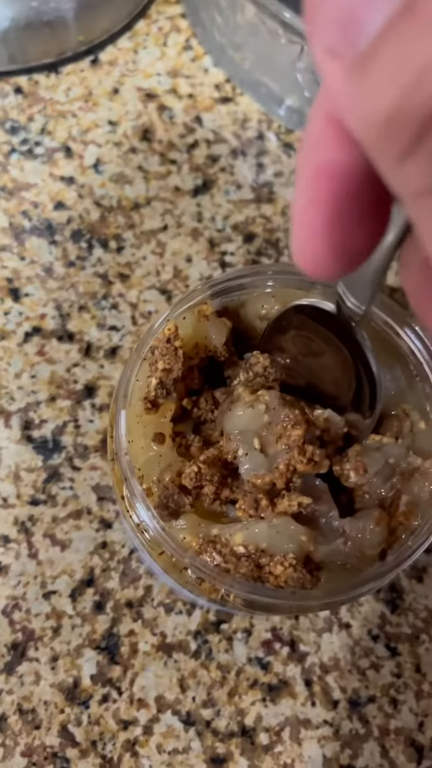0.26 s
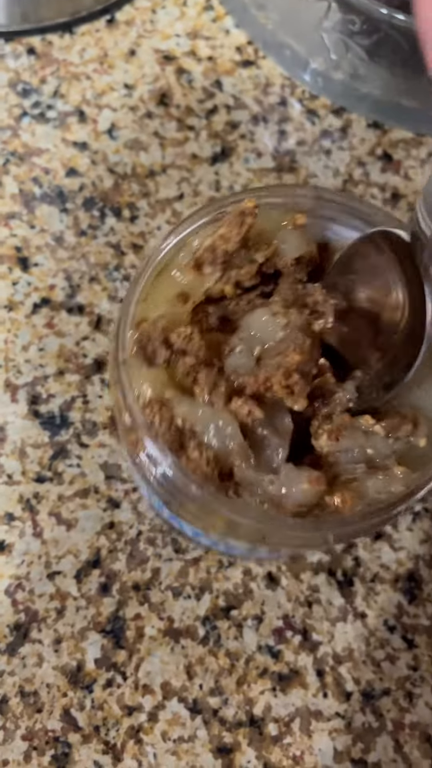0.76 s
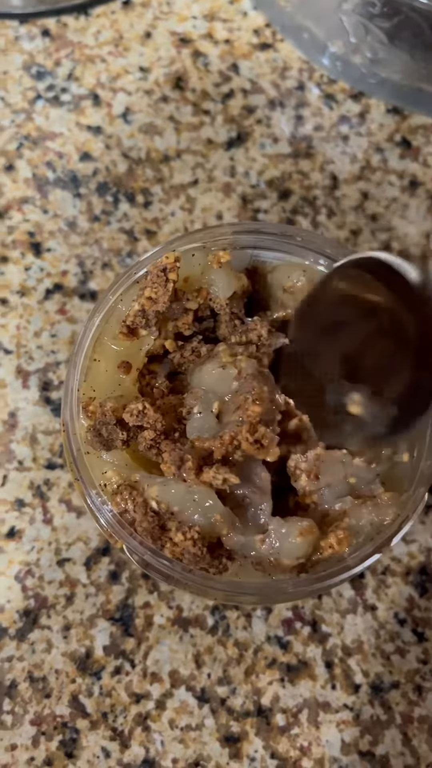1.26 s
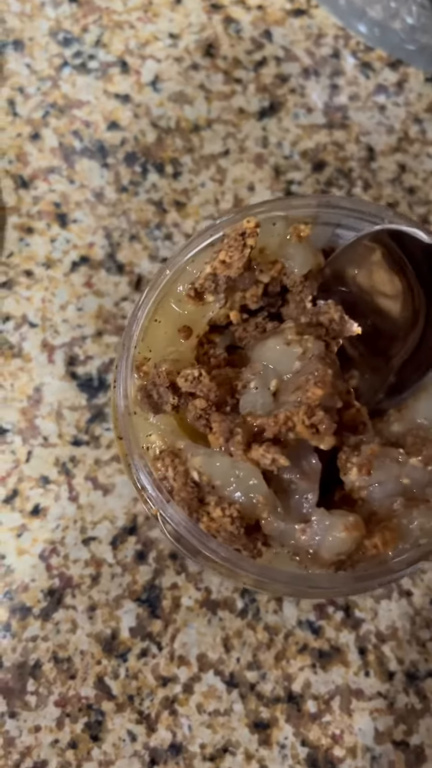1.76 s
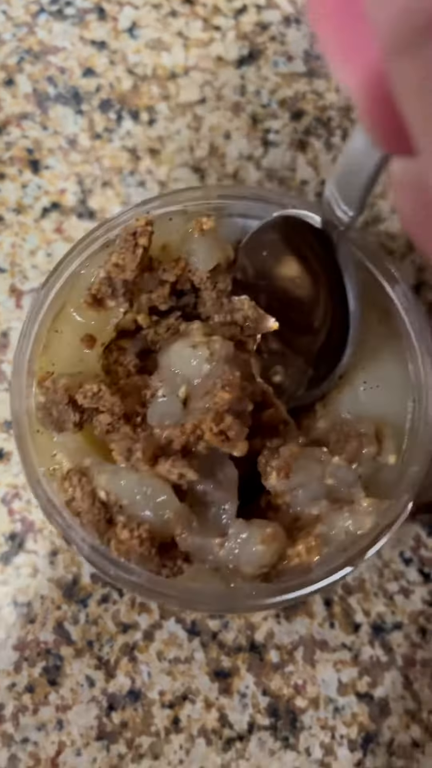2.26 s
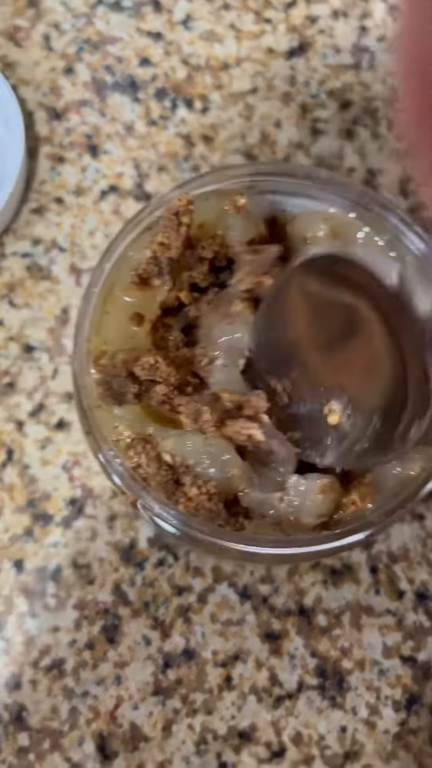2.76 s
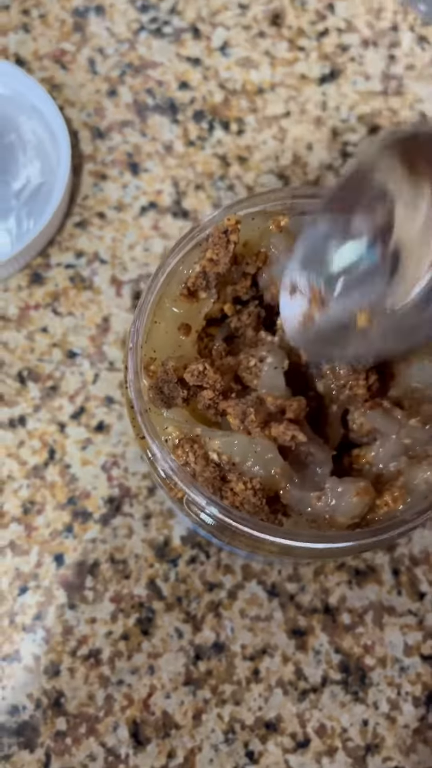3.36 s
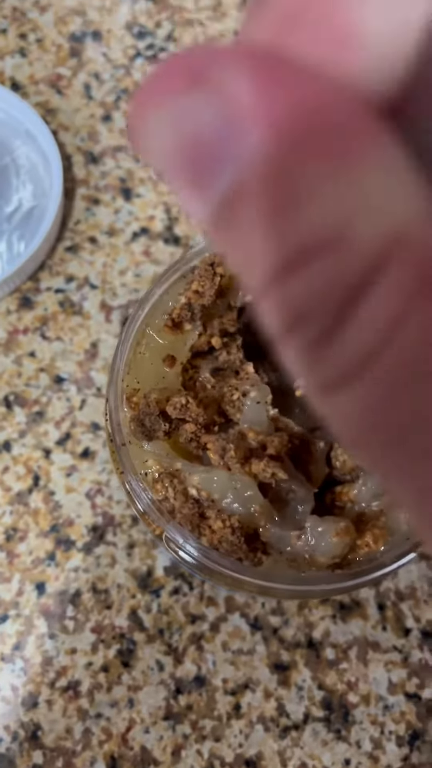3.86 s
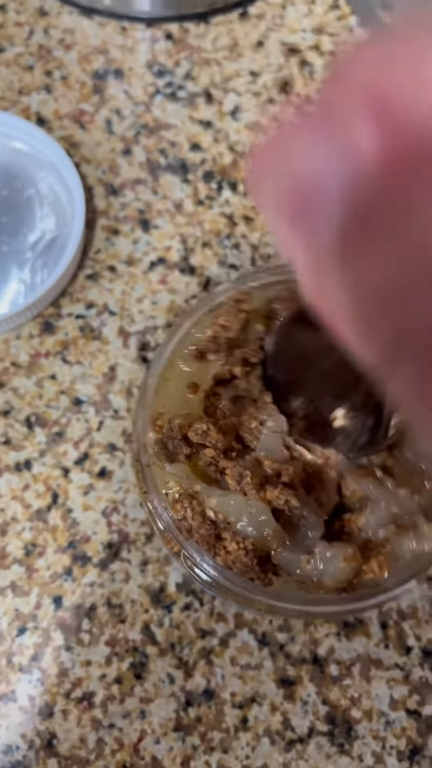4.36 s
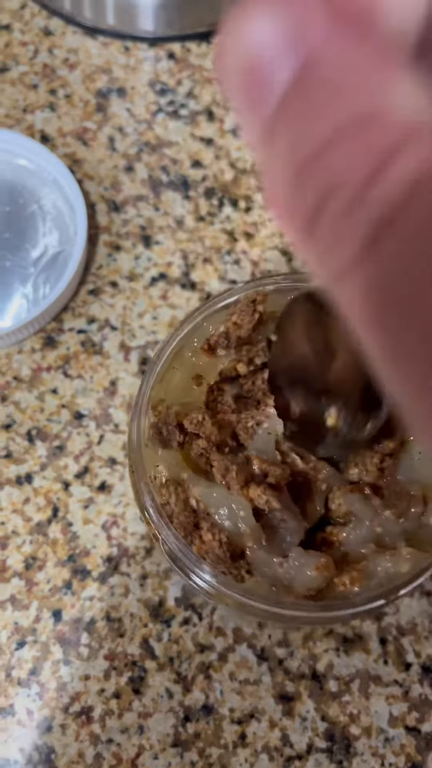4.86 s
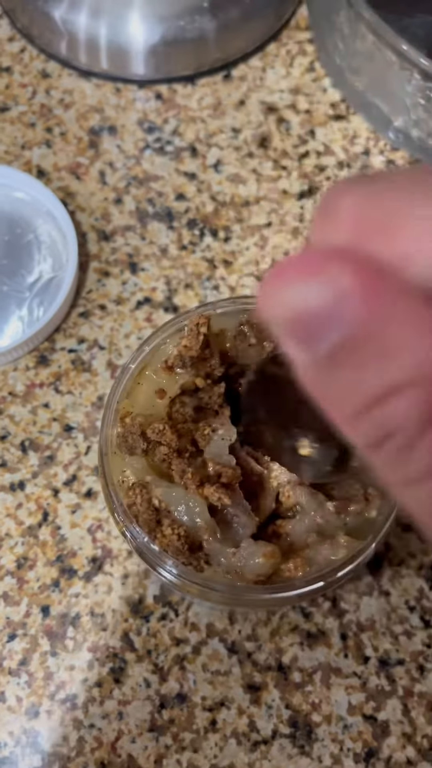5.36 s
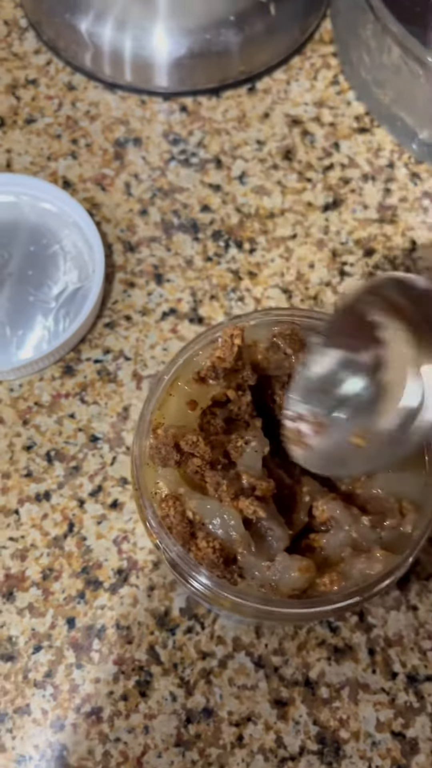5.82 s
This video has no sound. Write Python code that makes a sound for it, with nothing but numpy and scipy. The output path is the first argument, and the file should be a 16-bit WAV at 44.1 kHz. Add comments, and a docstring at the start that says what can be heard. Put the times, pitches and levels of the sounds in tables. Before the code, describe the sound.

Close up in a quiet kitchen, a spoon works sticky nut butter in a jar: dull knocks, short gritty rasps, ticks and tiny pops.

```python
"""A few faint ticks and pops over quiet room tone come first; then low thuds, raps and gritty scrapes set in.
A metal spoon is pushed again and again into thick peanut butter in a glass jar on a stone kitchen counter.
Knocks of the jar excite decaying modes of the slab; scrapes are coloured grit noise shaped stroke by stroke.
Taps and popping air pockets excite damped resonances, and bare glass clinks, squeaks and sings.
Kitchen reflections surround the jar, over a low rumble, a faint drone and a few dull, distant bumps."""
import sys
import numpy as np
from scipy import signal
from scipy.fft import rfft, irfft, next_fast_len
from scipy.io import wavfile

SR = 44100
rng = np.random.default_rng(int(sys.argv[2]) if len(sys.argv) > 2 else 0)


def waveform_to_disk(signal):
    """Save audio, clipped to [-1, 1], as 16-bit WAV at the path in sys.argv[1]."""
    frames = np.transpose(np.atleast_2d(signal))
    scaled = np.clip(frames, -1, 1) * 32767
    samples = np.round(scaled).astype(np.int16)
    wavfile.write(sys.argv[1], SR, samples)


N = 268569
TIME = np.arange(N) / SR
PADDED = next_fast_len(N + SR)
HZ = np.maximum(np.arange(PADDED // 2 + 1) * SR / PADDED, 1)

# jar knocked on the counter: t/s, relative level/dB, hardness of the contact as a corner f/Hz
KNOCKS = [(0.078, -59, 3000), (0.609, -45.5, 3000), (0.611, -23.5, 74), (0.681, -36, 127),
          (0.804, -34.5, 149), (1.204, -26, 54), (1.292, -36.5, 80), (1.581, -46, 109), (1.736, -34.5, 70),
          (2.114, -29.5, 65), (2.179, -12, 4000), (2.273, -30, 281), (2.725, -21.5, 69), (3.531, -19, 58.4),
          (4.301, -27, 225), (4.342, -33, 80), (4.529, -42, 139), (4.76, -29, 115), (4.881, -36.5, 350),
          (5.22, -49.5, 300), (5.232, -23, 66.3), (5.957, -31, 71)]
# resonances of spoon and jar, damped by the paste: f/Hz, width/Hz, relative level/dB
DAMPED_MODES = [(1700, 970, -7.5), (2880, 140, -7.5), (3290, 210, -5.5), (5130, 860, 3), (7170, 2070, 3),
                (9000, 3200, 6), (11700, 5500, 3), (13900, 1100, -3.5), (14910, 4200, -10.5)]


def from_db(db):
    """Decibels to amplitude gain: 20 dB is a factor of ten."""
    return 10 ** (np.asarray(db) / 20)


def rms_one(x):
    """Normalise the mean power, so that rms is 1."""
    return x / np.sqrt(np.mean(x ** 2) + 1e-20)


def at_hz(points, hz):
    """Interpolate a table on a logarithmic frequency axis, where equal steps are equal intervals."""
    f, value = np.transpose(points)
    return np.interp(np.log(hz), np.log(np.maximum(f, 1)), value)


def in_time(rows):
    """Interpolate each column of a time curve linearly at every sample."""
    s, *columns = np.transpose(rows)
    return [np.interp(TIME, s, column) for column in columns]


def filtered(x, response):
    """Linear filtering: the spectrum is multiplied by a frequency response."""
    return irfft(rfft(x, PADDED) * response, PADDED)[..., :N]


def coloured(x, spectrum):
    """Spectral shaping by a table of f/Hz and level/dB, normalised to rms 1."""
    return rms_one(filtered(x, from_db(at_hz(spectrum, HZ))))


def resonance(x, hz, width):
    """A damped oscillator as a two-pole filter: the pole radius sets the width, the peak gain is 1."""
    r = np.exp(-np.pi * width / SR)
    zeros = np.array([1, 0, -1]) * (1 - r * r) / 2
    poles = [1, -2 * r * np.cos(2 * np.pi * hz / SR), r * r]
    return signal.lfilter(zeros, poles, x + 1e-18)


def drift(rate):
    """Random modulation: low-passed noise with rms 1."""
    return rms_one(filtered(rng.standard_normal(N), 1 / (1 + (HZ / rate) ** 2)))


def thuds(vary_db=4, slop_s=.004, soft_hz=150, steady_hz=190, cushion_hz=250):
    """Dispersion: low bending waves travel slower in the slab, so the clack comes first and the boom last."""
    # what slab and jar ring with after a knock: f/Hz, relative level/dB, t60/s
    counter_modes = [(62, -.5, .038), (78, .2, .095), (84, -24, .5), (118, 1.5, .05), (156, -20, .2),
                     (194, -4.9, .057), (258, -3.5, .034), (300, -24.5, .34), (340, -27.5, .36),
                     (382, 1, .02), (488, -31, .12), (569, -12, .026), (786, -26, .08), (860, -22, .07),
                     (1032, -3, .013), (1241, -21.5, .04), (1669, -17, .016)]
    lag_cycles, rise_cycles = 2.1, .4
    out = np.zeros(N + SR)
    since = TIME[:SR // 2]
    for s, db, hard_hz in KNOCKS:
        # a soft push is a smear of slips, different every time
        softness = 1 / (1 + (hard_hz / soft_hz) ** 2)
        start = round(s * SR)
        draws = rng.standard_normal((len(counter_modes), 2))
        for (hz, mode_db, t60), (louder, later) in zip(counter_modes, draws):
            # the slow boom feels only the whole push
            chance = softness / (1 + (steady_hz / hz) ** 2)
            age = np.maximum(since - lag_cycles / hz - chance * slop_s * later, 0)
            onset = 1 - np.exp(-(age * hz / rise_cycles) ** 2)
            swing = onset * np.exp(-np.log(1000) * age / t60)
            strength = from_db(db + mode_db + chance * vary_db * louder) / (1 + (hz / hard_hz) ** 2)
            # the paste swallows the clack of a soft push
            strength /= 1 + (hz / (hard_hz + cushion_hz)) ** 4
            out[start:start + len(since)] += strength * swing * np.sin(2 * np.pi * hz * age)
    return out[:N]


def shudder(level_db=-29, fade_s=0.0063, soft_hz=400, boom_hz=80):
    """Friction noise: a soft push makes the jar's foot grind unevenly on the stone for a moment."""
    colour = ((25, -14), (55, 1), (110, -3), (180, 0), (330, -7), (520, -24), (1100, -28), (2500, -52))
    size = np.zeros(N)
    for s, db, hard_hz in KNOCKS:
        age = np.maximum(TIME - s, 0) / fade_s
        boom = from_db(db + level_db) / (1 + (boom_hz / hard_hz) ** 2)
        size += boom / (1 + (hard_hz / soft_hz) ** 2) * np.sqrt(age) * np.exp(1 - age)
    return size * coloured(rng.standard_normal(N), colour)


def rattle(level_db=-29.5, rise_s=0.01, fade_db_per_s=135, firm_hz=650):
    """Repeated impact: after a firm knock the jar chatters on the stone in uneven, dying contacts."""
    # of the jar's foot: f/Hz, relative level/dB
    foot_colour = [(110, -14), (160, 0.5), (330, 0.5), (450, -9), (580, -8.5), (750, -18.5), (1150, -16),
                   (1500, -26), (2500, -27.5), (5000, -40.5)]
    size = np.zeros(N)
    for s, db, hard_hz in KNOCKS:
        age = np.maximum(TIME - s, 0)
        firmness = 1 / (1 + (firm_hz / hard_hz) ** 2)
        size += from_db(db + level_db - fade_db_per_s * age) * np.minimum(age / rise_s, 1) * firmness
    return size * coloured(grit(per_s=120, spread_db=3.0, smooth=0.51), foot_colour)


def grit(per_s, spread_db, smooth):
    """Shot noise: contacts give way at random as clicks of uneven size, over a smooth smear."""
    sizes = from_db(spread_db * np.minimum(rng.exponential(1, N), 4)) * rng.choice([-1, 1], N)
    clicks = sizes * (rng.random(N) < per_s / SR)
    return rms_one(clicks) + smooth * rng.standard_normal(N)


def shifting_grit(ripple_hz=260, ripple_db=2.4, shift_rate=2.985, count=4):
    """Modal colouring: as the spoon touches the jar in other places, other mild resonances colour the grit."""
    knots = np.arange(0, SR / 2, ripple_hz)
    weights = np.exp([1.6 * drift(shift_rate) for place in range(count)])
    out = 0
    # the squared weights always sum to one, so the power is shared between the places
    for weight in weights / np.sqrt(np.sum(weights ** 2, axis=0)):
        ripple = np.interp(HZ, knots, rng.standard_normal(len(knots)))
        place_grit = grit(per_s=1900, spread_db=2.0, smooth=1.0)
        out = out + weight * rms_one(filtered(place_grit, from_db(ripple_db * ripple)))
    return out


def stroke_db(start, push, hold):
    """Viscous yielding: level swells with the push, sags as the paste yields, dies as the spoon comes to rest."""
    rise_db, sag_db_per_s, release_db_per_s = 20.5, 20.5, 273
    age = TIME - start - push
    swell = rise_db * (np.minimum(age, 0) / push) ** 2
    return -swell - sag_db_per_s * np.clip(age, 0, hold) - release_db_per_s * np.maximum(age - hold, 0)


def stroke_levels():
    """Spectral balance in dB: a bright stroke trades rub for crackle, one along the glass rasps more."""
    # strokes through the paste: start t/s, push/s, hold/s, relative level/dB, brightness/dB, rasp on the glass/dB
    strokes = [(0.07, 0.023, 0.88, -86, 2.5, -12), (0.495, 0.028, 0.14, -74.5, -2.5, -1.5),
               (0.612, 0.1, 0.039, -70, 6.5, 1), (0.744, 0.058, 0.058, -69, 3, 1.5),
               (1.188, 0.024, 0.11, -65, 4, -2), (1.312, 0.19, 0.12, -74.5, -1, -1),
               (1.532, 0.03, 0.021, -69.5, -1.5, -1.5), (1.597, 0.072, 0.04, -75.5, -5, -4),
               (1.933, 0.077, 0.064, -82.5, -3.5, -14), (2.165, 0.14, 0.0092, -69, 2.5, 5),
               (2.307, 0.044, 0.012, -68.5, 5, 6.5), (2.41, .03, 0.27, -93, 5.5, -1),
               (2.682, 0.04, 0.0043, -62, 5.5, -2), (2.766, 0.13, 0.025, -70, 2, 0.5),
               (2.896, 0.087, 0.037, -73.5, 1.5, -2.5), (3.173, 0.042, 0.014, -72.5, 9.5, 10),
               (3.23, 0.027, 0.012, -97.5, 4.5, 0), (3.527, 0.014, 0.0047, -59, 1.5, -4),
               (3.55, .02, 0.043, -72.5, -0.5, -7), (3.597, 0.11, 0.06, -68, -2, -4),
               (3.893, 0.068, 0.097, -79, 3.5, 2), (4.289, 0.0059, 0.062, -64.5, 1.5, 0),
               (4.337, 0.024, 0.1, -74, -4, -7.5), (4.672, 0.019, 0.11, -75.5, 1, -11),
               (4.75, 0.056, 0.031, -67.5, 1, -4), (4.871, 0.023, 0.057, -65, -1.5, 4),
               (5.205, 0.044, 0.14, -65.5, 1.5, 1), (5.42, 0.17, 0.11, -85, 8.5, -2.5),
               (5.591, 0.039, 0.031, -71.5, 3.5, 0), (5.906, 0.09, .12, -67.5, 5.5, -1)]
    rub = rasp = crackle = np.full(N, -np.inf)
    for start, push, hold, db, bright_db, glass_db in strokes:
        level = db + stroke_db(start, push, hold)
        rub = np.maximum(rub, level - bright_db)
        rasp = np.maximum(rasp, level + glass_db)
        crackle = np.maximum(crackle, level + bright_db)
    return rub, rasp, crackle


def scrape(lumps_db=1.0, patchy_db=1.8, crumbs_db=-15.5, clump_db=3.5):
    """Shear and fracture: crumbs and lumps drive all registers, while threads snap in clumps in each alone."""
    # low rub: f/Hz, relative level/dB
    rub_colour = [(120, -5), (250, -5.5), (400, 0), (600, -32), (1000, 0), (1400, 5), (1800, 8.5),
                  (2300, 4), (3000, 3.5), (3800, -9), (5000, -22)]
    # rasp on the glass: f/Hz, relative level/dB
    rasp_colour = [(2400, -15), (3300, 3), (4200, -3), (5100, 3.5), (5700, -4.5), (6600, -0.5), (8000, -16)]
    # fine crackle: f/Hz, relative level/dB
    crackle_colour = [(5000, -23), (7000, -5.5), (8500, -4), (9500, -3), (10500, 0), (11850, 2),
                      (13000, -3), (14500, -4), (15600, -2), (16100, -31.5)]
    colours = rub_colour, rasp_colour, crackle_colour
    register_db, sticky_db = (0.5, -2.0, -1.6), (-5, -6, -1)
    shear = shifting_grit() + from_db(crumbs_db) * grit(per_s=49, spread_db=1.0, smooth=0)
    paste = 0
    for level, colour, db, threads_db in zip(stroke_levels(), colours, register_db, sticky_db):
        snaps = grit(per_s=480, spread_db=1.0, smooth=0) * from_db(clump_db * drift(50))
        threads = from_db(threads_db) * rms_one(snaps)
        gain = from_db(level + db + patchy_db * drift(45))
        paste = paste + gain * coloured(shear + threads, colour)
    return paste * from_db(lumps_db * drift(22))


def ticks(tap_db=-1.0, lowest_hz=1100):
    """Selective excitation: a tap rings all modes, a pop mainly those near its pitch and with little tail."""
    # the spoon taps the glass: t/s, relative level/dB, tilt/(dB per octave), contact time scale/s
    tap_rows = [(0.08, -64.5, -19, 0.00047), (0.508, -75, 1, .0006), (0.525, -48.5, -5.5, 0.0044),
                (0.568, -58.5, -6.5, 0.0025), (1.209, -86, -17, 0.0027), (1.541, -43.5, -10, 0.0019),
                (2.1806, -35, -8.5, 0.0025), (2.1866, -47, 0.5, 0.0013), (2.276, -50, -7, 0.00081),
                (2.391, -56, -5, 0.002), (2.8887, -65, 2.5, 0.00065), (3.191, -73, 6, 0.0023),
                (3.202, -57.5, 6.5, 0.0026), (3.21, -64, 4.5, 0.00074), (3.538, -60.5, -14, 0.001),
                (3.544, -57, -14, 0.0028), (4.0145, -48, -1, 0.00057), (4.2942, -48.5, -7.5, 0.0011),
                (4.3, -47.5, -13, 0.028), (4.886, -44, -2.5, 0.00088), (4.913, -56, -19, .002),
                (5.27, -54, -19, 0.00081), (5.6652, -62, 0.5, 0.0017)]
    # air pockets pop in the paste: t/s, relative level/dB, pitch f/Hz
    pop_rows = [(0.086, -72, 12800), (0.1073, -57, 12100), (0.1701, -58.5, 11900), (0.188, -77, 9500),
                (0.1943, -61, 10800), (0.2162, -60.5, 10900), (0.292, -70.5, 11700), (0.463, -60, 8200),
                (0.492, -55.5, 11100), (0.514, -66, 10500), (0.5263, -48, 12100), (1.272, -52, 12600),
                (1.5176, -47.5, 10100), (1.57, -55.5, 11000), (1.7648, -65.5, 5700), (1.887, -86, 9000),
                (2.691, -65, 12160), (2.735, -56.5, 9300), (2.745, -67.5, 9000), (2.9, -71, 12500),
                (3.01, -59, 12900), (3.0463, -63.5, 13600), (3.073, -70.5, 13900), (3.271, -69, 7860),
                (3.2811, -60, 5300), (3.889, -69, 14700), (3.9995, -67.5, 12500), (4.4159, -58.5, 9200),
                (4.4198, -60.5, 8900), (4.681, -67.5, 9600), (4.798, -58, 12600), (4.811, -63, 12500),
                (4.8296, -45.5, 9500), (4.837, -67, 6050), (4.873, -58, 13100), (4.8893, -49.5, 9700),
                (5.357, -58, 13500), (5.465, -73.5, 14000), (5.519, -78, 10000), (5.535, -73, 10700),
                (5.604, -70.5, 10000), (5.618, -65, 9740), (5.626, -62.5, 10200)]
    tap_pivot_hz = 1960   # the tilt turns about this pitch
    pop_s, pop_skirt_db_per_octave = 0.0016, 16.5
    mode_hz = np.transpose(DAMPED_MODES)[0]
    taps, pops = np.zeros(N), np.zeros(N)
    for s, db, tilt, length in tap_rows:
        taps += tick(s, length, db + tilt * np.log2(mode_hz / tap_pivot_hz), tail_db=-6.5)
    for s, db, hz in pop_rows:
        octaves_away = np.abs(np.log2(mode_hz / hz))
        pops += tick(s, pop_s, db - pop_skirt_db_per_octave * octaves_away, tail_db=-32)
    too_small_for_bass = signal.butter(4, lowest_hz, "high", fs=SR, output="sos")
    return signal.sosfilt(too_small_for_bass, from_db(tap_db) * taps + pops)


def tick(s, length, colour_db, tail_db, tail_s=0.0073, size=2048):
    """Impulse response: a snap, a burst of tiny slips and a short crumble all ring the damped modes."""
    snap_s = .0012   # snap and slips are equally strong at this length; longer contacts grind
    span_s = .005   # each mode's energy is scaled to that of rms 1 over this span
    out, age = np.zeros(N + size), np.arange(size) / SR
    noise, start = rng.standard_normal(size), round(s * SR)
    snap = rms_one(1. * (age == 0))
    burst = rms_one(noise * age * np.exp(-np.e * age / length))
    crumble = rms_one(noise * np.exp(-age / tail_s))
    force = rms_one(snap + length / snap_s * burst) + from_db(tail_db) * crumble
    for k, (hz, width, db) in enumerate(DAMPED_MODES):
        mode = resonance(force, hz, width) * (-1) ** k
        mode /= np.sqrt(np.sum(mode ** 2) / (span_s * SR))
        out[start:start + size] += from_db(db + colour_db[k]) * mode
    return out[:N]


def clinks(rise_s=0.00033):
    """Free vibration: the struck bare wall rings briefly, its pitch set by how much paste clings to the spot."""
    # the bare jar wall is struck: t/s, relative level/dB, lowest pitch f/Hz
    strikes = [(0.526, -40, 1590), (1.5423, -46.5, 1840), (2.277, -44.5, 1670), (2.291, -56, 1900),
               (2.391, -47.5, 1900), (4.294, -48, 1930), (4.311, -46, 2720), (4.8856, -37, 1700)]
    # its ring: multiple of the lowest pitch, relative level/dB, t60/s
    glass_modes = [(1, 3.5, 0.0097), (1.015, -32, 0.11), (1.62, -5, 0.0033), (2.85, -21, 0.007)]
    out, age = np.zeros(N + SR), TIME[:SR // 4]
    for s, db, hz in strikes:
        ring = 0
        for multiple, level, t60 in glass_modes:
            decay = from_db(level) * np.exp(-np.log(1000) * age / t60)
            ring = ring + decay * np.sin(2 * np.pi * hz * multiple * age)
        start = round(s * SR)
        out[start:start + len(age)] += from_db(db) * ring * (1 - np.exp(-age / rise_s))
    return out[:N]


def squeaks(width_hz=150, broken_db=4.0):
    """Stick-slip: the spoon's edge catches and slides on the glass in a thin, broken tone that glides."""
    # thin squeaks of the metal: t/s, duration/s, relative level/dB, start f/Hz, end f/Hz
    glides = [(2.452, 0.44, -81.5, 11840, 11860), (2.677, 0.071, -63.5, 11800, 11900),
              (2.765, 0.086, -83, 12500, 13000), (2.923, 0.086, -76, 12800, 12000),
              (4.943, 0.062, -72, 11800, 11750), (5.862, 0.15, -79.5, 12000, 12300)]
    size, pitch = np.zeros(N), np.zeros(N)
    for s, length, db, from_hz, to_hz in glides:
        along = np.clip((TIME - s) / length, 0, 1)
        size += from_db(db) * 2 * np.sqrt(along * (1 - along))
        pitch = np.where(along > 0, from_hz + (to_hz - from_hz) * along, pitch)
    phase = 2 * np.pi * np.cumsum(pitch) / SR
    tone = drift(width_hz) * np.sin(phase) + drift(width_hz) * np.cos(phase)
    return size * rms_one(tone * from_db(broken_db * drift(38)))


def thin_tone(curve, hz, width):
    """Narrow-band noise: two equal resonances in series hold noise to one unsteady tone."""
    narrow = resonance(resonance(rng.standard_normal(N), hz, width), hz, width)
    return from_db(in_time(curve)[0]) * rms_one(narrow)


def singing():
    """Friction-driven resonance: the spoon's edge drags along the wall and makes the glass sing."""
    # the lower note: t/s, level/dB
    low_note = [(2.27, -120), (2.335, -70), (2.375, -69), (2.395, -66), (2.41, -81), (2.47, -90),
                (2.52, -120)]
    # the higher note: t/s, level/dB
    high_note = [(2.3, -120), (2.345, -61), (2.395, -68), (2.44, -120), (4.88, -120), (4.92, -71),
                 (4.975, -70), (5.0, -68), (5.04, -120)]
    return thin_tone(low_note, hz=1900, width=220) + thin_tone(high_note, hz=4950, width=550)


def clatter(x, fade_s=0.0079, lowest_hz=600, size=4096):
    """Scattering: pots and walls close by turn a knock into a quick spray of echoes."""
    age = TIME[:size]
    echoes = rng.standard_normal((2, size)) * age / fade_s * np.exp(-age / fade_s * 2)
    response = rfft(echoes / np.sqrt(np.sum(echoes[0] ** 2)), PADDED)
    return filtered(x, response / (1 + (lowest_hz / HZ) ** 4))


def kitchen(x, first_s=0.00082):
    """Reverberation: dense reflections, each octave dying at its own rate."""
    # ring of the kitchen: f/Hz, t60/s
    kitchen_t60 = [(80, 0.47), (300, 0.36), (1000, 0.17), (4000, 0.16), (14000, 0.083)]
    age = TIME[:SR * 3 // 4]
    tail = 0
    for hz in 62.5 * 2. ** np.arange(9):
        edges = [hz / np.sqrt(2), min(hz * np.sqrt(2), .45 * SR)]
        band = signal.butter(2, edges, "band", fs=SR, output="sos")
        decay = np.exp(-np.log(1000) * age / at_hz(kitchen_t60, hz)) * (1 - np.exp(-(age / first_s) ** 2))
        noise = signal.sosfilt(band, rng.standard_normal((2, len(age))))
        tail = tail + noise * decay / np.sqrt(np.sum(decay ** 2))
    return filtered(x, rfft(tail, PADDED))


def ports(x):
    """Interaural-like cues: close sounds reach the two microphone ports with different delay and shade."""
    # phase between the ports: f/Hz, phase by which left leads/rad
    port_phase = [(0, 0), (400, -.4), (700, -1.1), (1120, -.4), (1640, -.3), (2930, 2.5), (5080, 1.7),
                  (7580, 6.0), (8800, 6.7), (9730, 9.2), (10900, 9.8), (12050, 12.5), (13200, 12.7),
                  (14000, 15.3), (16300, 16.8)]
    # level between the ports: f/Hz, left minus right/dB
    port_balance = [(60, -2), (130, -1.5), (290, -5), (600, -4.5), (1000, -2), (2000, -0.5), (4000, -4),
                    (8000, 2.5), (15000, 0.4)]
    lead = np.interp(HZ, *np.transpose(port_phase))
    tilt = from_db(at_hz(port_balance, HZ) / 2) * np.exp(.5j * lead)
    return filtered(x, np.array([tilt, 1 / tilt]))


def narrowed(x, alike_hz=700):
    """Spatial coherence: the ports are close together, so long waves reach both alike."""
    mid = (x[0] + x[1]) / 2
    side = filtered((x[0] - x[1]) / 2, HZ / np.hypot(HZ, alike_hz))
    return np.array([mid + side, mid - side])


def diffuse(spectrum):
    """Diffuse field: noise from all round, alike at the ports for long waves, with a given spectrum."""
    return coloured(narrowed(rng.standard_normal((2, N)), alike_hz=694), spectrum)


def bumps(ring_width_hz=18, rise_s=0.051, decay_db_per_s=126):
    """Distant impact: each far bump swells, blurred by the room, rings hollowly and dies away."""
    # dull bumps further off in the room: t/s, relative level/dB, mean pitch of their ring f/Hz
    far_bumps = [(2.791, -65.5, 309), (2.879, -67, 289.3), (3.797, -52.5, 172.2)]
    # their noise: f/Hz, relative level/dB
    bump_colour = [(70, -8), (130, -4.5), (160, 5), (200, -3.5), (240, -19), (350, -8), (500, -20.5),
                   (1250, -22.5), (1700, -33), (4000, -76)]
    out, blur = 0, diffuse(bump_colour)
    for s, db, hz in far_bumps:
        rise = np.clip((TIME - s) / rise_s, 0, 1)
        size = rise * from_db(db - decay_db_per_s * np.maximum(TIME - s - rise_s, 0))
        pitch = hz + ring_width_hz / 2 * drift(20.4)
        ring = np.sin(2 * np.pi * np.cumsum(pitch) / SR)
        out = out + size * (blur + ring)
    return out


def background(room_tone_db=-70.5, hiss_db=-84.5, waver_db=4.5, wobble_hz=8.4):
    """Superposition: diffuse room tone, rumble and soft air, with drone, far bumps and a hollow tone."""
    # a faint outside drone: t/s, mean f/Hz, mean level/dB
    drone_curve = [(0, 108, -75.5), (1, 105.6, -64.5), (1.6, 110, -66.5), (2.1, 115, -66),
                   (2.6, 124.3, -77.5), (3.05, 123.6, -64), (3.35, 118.3, -65.5), (3.7, 107.6, -71.5),
                   (6.09, 104.3, -84)]
    # low rumble while the jar is handled: t/s, level/dB
    rumble_curve = [(0.3, -80), (0.6, -68), (2.1, -66.5), (2.55, -67), (3.4, -67), (4.6, -71.5),
                    (5.1, -82.5), (6.09, -74)]
    # spectrum of the room tone: f/Hz, relative level/dB
    room_colour = [(15, -34.5), (25, -23), (43, -3.5), (102, -6), (145, -18), (293, -22.5), (373, -28),
                   (1400, -29.5), (1650, -21), (2280, -31), (2690, -50), (3080, -40.5), (10400, -50),
                   (12900, -49), (16000, -65)]
    # a faint hollow tone: t/s, level/dB
    hollow_curve = [(5.7, -100), (5.9, -75.5), (6.0, -75), (6.09, -72)]
    air_colour = [(900, -20.0), (1350, -19.5), (1600, -1.5), (1950, -21.5),
                  (2350, -4.0), (2750, -23.5), (5000, -46.0)]
    rumble_colour = [(20, -22.5), (45, -3.5), (80, -2), (130, -12.5), (300, -29), (1000, -70.5)]
    drone_hz, drone_db = in_time(drone_curve)
    drone_gain = from_db(drone_db + waver_db * np.tanh(drift(35)))
    drone = drone_gain * np.sin(2 * np.pi * np.cumsum(drone_hz + wobble_hz * drift(3.7)) / SR)
    air = from_db(hiss_db) * diffuse(air_colour)
    rumble = from_db(in_time(rumble_curve)[0]) * diffuse(rumble_colour)
    room_tone = from_db(room_tone_db) * diffuse(room_colour)
    return room_tone + rumble + air + drone + bumps() + thin_tone(hollow_curve, hz=423, width=130)


def scene(thud_db=-0.5, clatter_db=-12, thud_room_db=-4.0, room_thin_hz=130, room_dull_hz=650, spoon_room_db=-21):
    """Direct and reverberant field: jar and spoon close by, the kitchen around them."""
    knocks = from_db(thud_db) * thuds() + shudder() + rattle()
    spoon = ticks() + clinks() + scrape() + squeaks() + singing()
    # the deepest boom stays near the slab, the clack is soon absorbed
    carried = filtered(knocks, 1j * HZ / (room_thin_hz + 1j * HZ) / (1 + 1j * HZ / room_dull_hz))
    room = kitchen(from_db(thud_room_db) * carried + from_db(spoon_room_db) * spoon)
    echoes = from_db(clatter_db) * narrowed(clatter(knocks))
    return ports(knocks + spoon + echoes) + narrowed(room) + background()


def record(dry):
    """Band limiting: an elliptic low-pass, run forward and back for zero phase, cuts the top steeply."""
    cutoff_hz = 16600
    return signal.sosfiltfilt(signal.ellip(10, .05, 60, cutoff_hz, fs=SR, output="sos"), dry)


dry = scene()
out = record(dry)
waveform_to_disk(out)
```